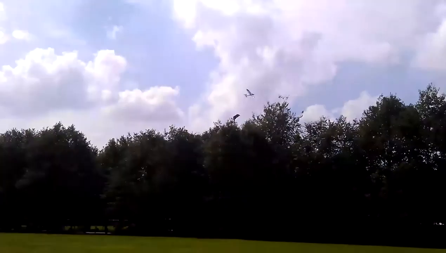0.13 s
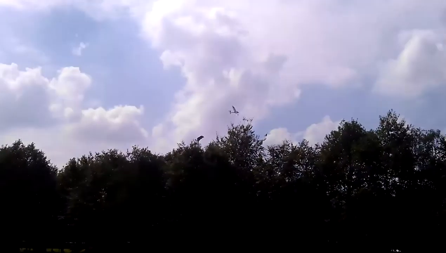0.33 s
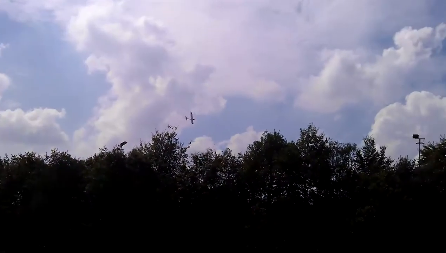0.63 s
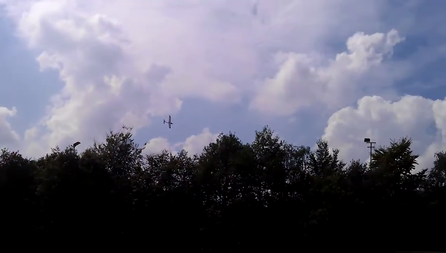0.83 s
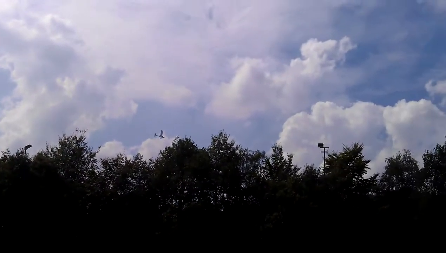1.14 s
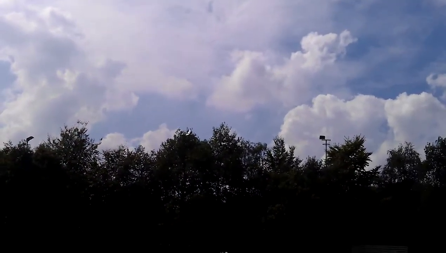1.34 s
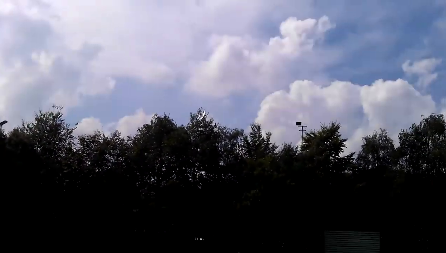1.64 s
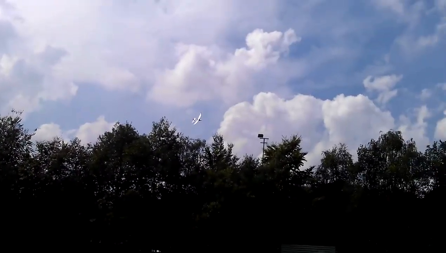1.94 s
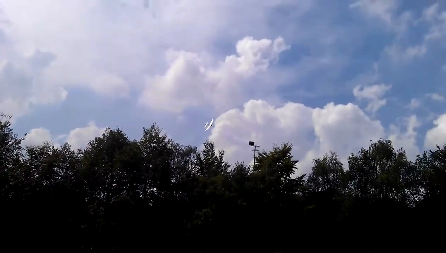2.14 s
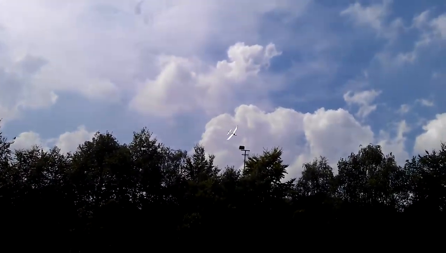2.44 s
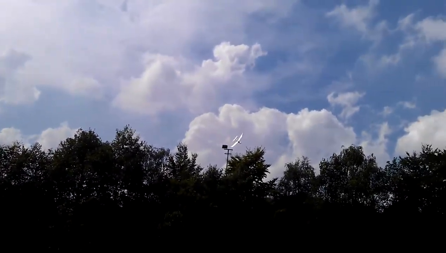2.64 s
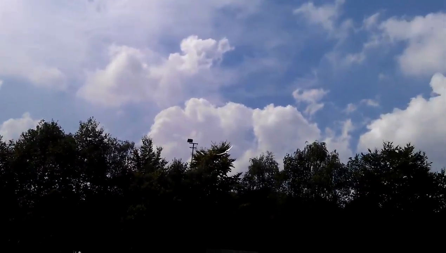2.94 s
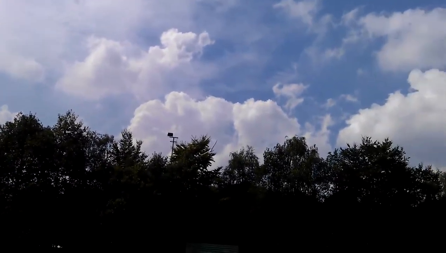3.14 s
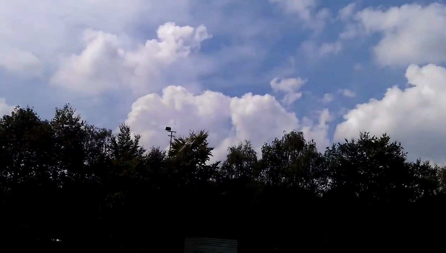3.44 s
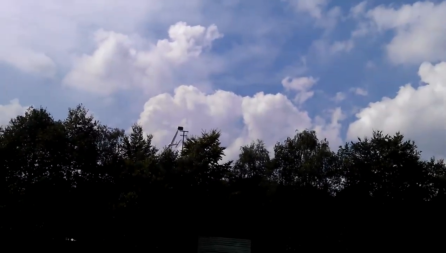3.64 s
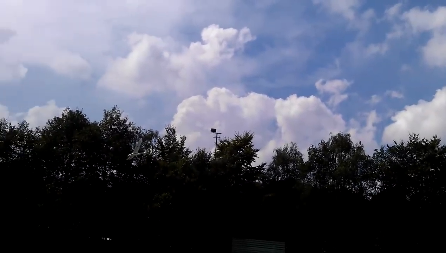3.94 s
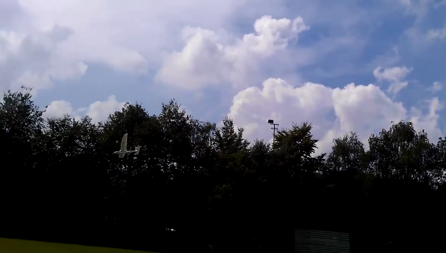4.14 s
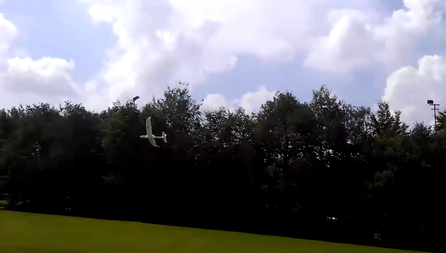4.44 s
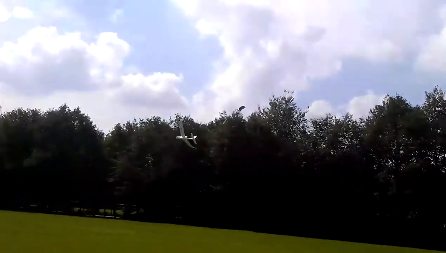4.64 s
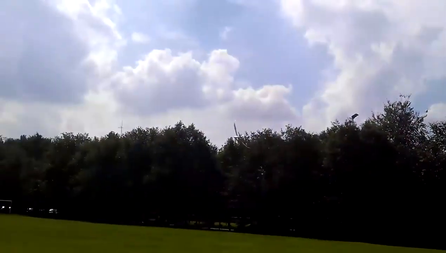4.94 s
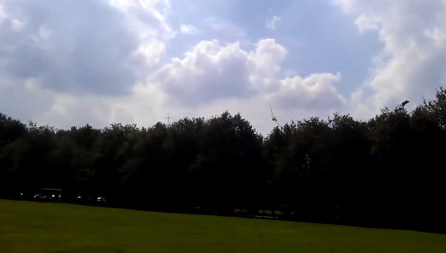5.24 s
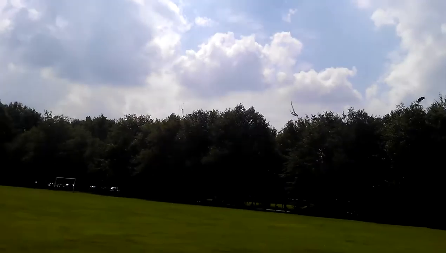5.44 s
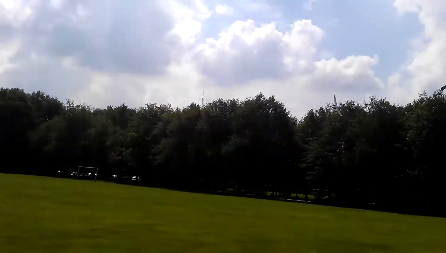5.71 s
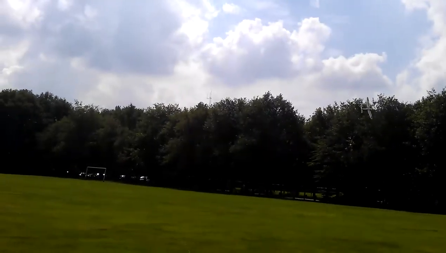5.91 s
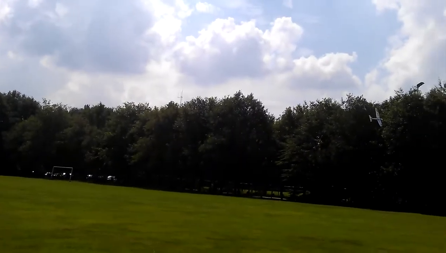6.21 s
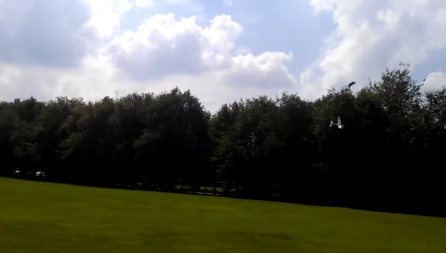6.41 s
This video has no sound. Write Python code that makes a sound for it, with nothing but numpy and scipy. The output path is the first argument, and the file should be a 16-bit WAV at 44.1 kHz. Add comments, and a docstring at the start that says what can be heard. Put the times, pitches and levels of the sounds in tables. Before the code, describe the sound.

After a brief silence, at about 0.7 seconds a small electric model plane is heard over an open field: a buzzing propeller, a high motor whine and a light rush of air. Faint distant traffic, leaves and a breeze lie underneath. From 1.5 seconds the buzz grows, swelling and dipping as the plane banks, its pitch rising only slightly. A soft bump on the hand-held camera comes at 2.6 seconds, followed by a faint far-off hoot. A sharp camera click sounds at 4 seconds. The plane is loudest between 4 and 4.6 seconds, dipping in pitch as it passes close. Then the throttle closes and the whine slides steeply down, fading out by about 6 seconds. A small click comes at 5.1 seconds, and a sleeve rustles faintly from 5.6 to 6.3 seconds over the quiet field.

```python
"""A small electric model plane circles over a field, passes close, then is throttled off and spins down.
Periodic blade loading gives the two-blade propeller its hum, and turbulence its rush. The motor whines
at multiples of the shaft rate; the speed controller sings at its Doppler-shifted switching rate.
Trees scatter a faint echo over distant traffic, leaves, a breeze and one far hoot.
The hand-held camera adds a bump, a few clicks and the rustle of a sleeve."""
import sys
import numpy as np
from scipy import signal
from scipy.fft import rfft, irfft
from scipy.io import wavfile
from scipy.ndimage import uniform_filter1d, map_coordinates

SR = 44100
rng = np.random.default_rng(int(sys.argv[2]) if len(sys.argv) > 2 else 0)


def log_audio(samples):
    """Write samples as a 16-bit WAV file to the path given in sys.argv[1]."""
    # one column per channel
    frames = np.atleast_2d(samples).T
    # limit to full scale, then quantise
    limited = np.clip(frames, -1, 1)
    pcm = np.round(limited * 32767).astype(np.int16)
    wavfile.write(sys.argv[1], SR, pcm)


N = 289869
T = np.arange(N) / SR

CUT_S, IDLE_S, DRIVE_STOP_S, STALL_S = 4.58, 4.9, 0.14, 6.0
AIRSPEED_M_S, SOUND_M_S, SWITCHING_HZ = 10.6, 343, 7750
TURN_S = (4.65, 4.87)  # start and end of the camera's turn away
POLE_ROUGHNESS = 0.18  # depth of fast random amplitude modulation

# Shaft rotation rate as heard: t/s, f/Hz
SHAFT_RATE = [(0.67, 223.3), (1.35, 223.3), (1.5, 227.3), (1.62, 228.2), (1.84, 232.0), (2.0, 233.1),
              (2.16, 231.7), (2.5, 233.1), (2.65, 236.0), (2.99, 238.3), (3.25, 237.2), (3.47, 241.1),
              (3.63, 239.7), (3.8, 239.7), (3.92, 240.7), (4.09, 239.5), (4.23, 237.0), (4.38, 231.9),
              (4.57, 228.1), (4.6, 223.5), (4.65, 212), (4.75, 199.5), (4.82, 182.0), (4.9, 147.7),
              (4.95, 129.5), (5.04, 107.6), (5.15, 87.8), (5.28, 68.9), (5.42, 54), (5.6, 40.5),
              (5.85, 23.9), (6.1, 8)]
# Velocity towards the listener: t/s, v/(m/s)
RADIAL_VELOCITY = [(0.67, -7.6), (1.32, -5.03), (1.92, 3.37), (2.82, 7.36), (3.2, 10.59), (3.78, 9.72),
                   (4.16, 4.89), (4.56, -7.79), (4.89, -13.57)]
# Loudness set by distance and throttle, relative to the close pass: t/s, level/dB
FLYBY_LEVEL = [(0.67, -14), (1.3, -15.5), (1.48, -9.5), (1.86, -6.5), (2.0, -13.5), (2.2, -13.5),
               (2.32, -6), (2.56, -9.5), (2.82, -7), (3.1, -11), (3.24, -10.5), (3.32, -6), (3.46, -6),
               (3.74, -8.5), (3.86, -2.5), (4.3, 0), (4.58, 0.5), (4.84, -9.5), (5.15, -21), (6.55, -31.5)]
# Shaft harmonics of the uneven blades: order, relative level/dB
RASP_ORDERS = [(1, -19), (3, -9.5), (5, -18.5), (6, -12.5), (7, -13), (8, -14), (9, -16.5), (11, -15.5),
               (12, -17.5), (13, -18), (14, -17.5), (15, -17.5), (16, -15.5), (17, -15.5), (19, -15),
               (20, -20), (34, -13)]
# Flares and dips of single harmonics in banking: t/s, half-width/s, order, gain/dB
BANKING_FLARES = [(1.47, .08, 10, 7), (1.48, .1, 12, 12), (1.53, .12, 8, 9.5), (1.55, .11, 14, 9),
                  (1.6, .08, 6, 10), (1.7, .06, 12, 6), (1.76, .06, 13, 10), (1.85, .07, 6, 9),
                  (2.35, .12, 7, 7), (2.35, .08, 17, 7), (2.6, .42, 1, 15), (2.55, .25, 3, 9),
                  (2.7, .2, 8, 9), (2.9, .1, 12, 6), (3.35, .1, 10, 8), (3.55, .16, 13, 9), (3.5, .2, 6, 5),
                  (3.55, .14, 11, 5), (3.83, .06, 16, 6), (3.92, .07, 9, 10.5), (3.93, .07, 11, 7),
                  (3.93, .09, 13, 5), (3.95, .07, 6, 4), (4.05, .11, 12, 6), (4.16, .06, 8, 8),
                  (4.2, .14, 6, -5), (4.26, .07, 3, 6), (4.27, .12, 5, 7), (4.3, .054, 7, 8),
                  (4.32, .055, 11, 11), (4.493, .09, 7, 5.5), (4.54, .08, 12, 6), (4.53, .04, 17, 6)]

# Envelopes of the plane's tones: t/s, relative level/dB
BLADE_LEVEL = [(0.67, -58), (1.16, -57.5), (1.63, -44.5), (2.09, -53), (2.33, -46.5), (3.29, -59),
               (3.67, -51.5), (4.13, -33.5), (4.34, -32.5), (4.58, -49), (4.66, -36), (4.93, -65)]
OCTAVE_LEVEL = [(.67, -56), (1.2, -60.5), (1.58, -47), (2.0, -66.5), (2.9, -65), (3.1, -56.5), (3.7, -51.5),
                (3.92, -41.5), (4.3, -33.5), (4.5, -47.5), (4.7, -48.5), (4.85, -72)]
AIRFRAME_LEVEL = [(0.67, -71.5), (1.4, -60), (1.6, -66), (2.05, -69.5), (2.3, -55), (2.6, -57), (2.9, -68),
                  (3.6, -65), (3.85, -59), (4.03, -48), (4.2, -46), (4.3, -48), (4.39, -59), (4.5, -44),
                  (4.6, -44.5), (4.68, -56), (4.8, -64)]
COMMUTATION_LEVEL = [(0.67, -44), (1.1, -44), (1.17, -56), (1.25, -43.5), (1.34, -46), (1.4, -34),
                     (1.46, -36), (1.54, -28), (1.6, -34), (1.64, -45), (1.7, -32), (1.8, -32.5),
                     (2.1, -47.5), (2.16, -50), (2.25, -34.5), (2.44, -31.5), (2.56, -40), (2.66, -30),
                     (2.84, -48.5), (2.89, -31.5), (2.96, -51), (3.03, -48.5), (3.25, -52), (3.36, -49.5),
                     (3.74, -51), (3.85, -31.5), (3.93, -34), (3.99, -44.5), (4.03, -34.5), (4.06, -43.5),
                     (4.1, -31), (4.15, -29), (4.2, -43), (4.28, -25), (4.35, -34), (4.44, -27),
                     (4.56, -33.5), (4.62, -26.5), (4.66, -47), (4.73, -43.5), (4.79, -61)]  # swells and fades as the plane banks
POLE_LEVEL = [(0.67, -58), (1.2, -62), (1.36, -52.5), (1.46, -54), (1.53, -44), (1.6, -45), (1.67, -49.5),
              (1.76, -45.5), (1.88, -49), (2.0, -52), (2.15, -55), (2.35, -50), (2.55, -56), (2.72, -49),
              (3.15, -57), (3.47, -48), (3.89, -50.5), (3.95, -60), (4.0, -44), (4.08, -42.5), (4.22, -51),
              (4.31, -38), (4.35, -45.5), (4.42, -42.5), (4.55, -49.5), (4.64, -49), (4.72, -48),
              (4.78, -58)]
SIDEBAND_LEVEL = [(0.67, -67), (3.7, -65), (4.2, -50), (4.3, -37), (4.34, -44.5), (4.42, -34), (4.6, -40.5),
                  (4.67, -64)]  # beamed to the rear
SWITCHING_LEVEL = [(0.67, -53), (0.78, -54), (0.92, -58), (1.34, -52.5), (1.44, -33), (1.51, -47),
                   (1.58, -35), (1.65, -44), (1.73, -38), (1.93, -50.5), (2.17, -50.5), (2.26, -43),
                   (2.47, -37.5), (2.6, -49), (2.68, -40), (2.74, -58), (2.8, -44), (2.88, -37),
                   (2.97, -53), (3.03, -44), (3.5, -44.5), (3.63, -55.5), (3.95, -44.5), (4.02, -34.5),
                   (4.13, -29), (4.21, -44.5), (4.27, -31.5), (4.33, -48.5), (4.41, -34.5), (4.5, -36.5),
                   (4.57, -45), (4.73, -47), (4.8, -63)]
LOWER_BEAT_LEVEL = [(0.67, -63.5), (1.3, -66.5), (1.47, -57), (2.05, -67.5), (2.75, -58.5), (3.18, -58),
                    (3.3, -46.5), (3.75, -47), (3.92, -44.5), (4.08, -58.5), (4.29, -43.5), (4.36, -62.5)]
# Envelope of the traffic rumble: t/s, level/dB
TRAFFIC_LEVEL = [(.65, -63), (2.7, -58), (3.3, -65.5), (4.6, -65), (5.4, -68), (6.5, -73.5)]

# Noise spectra, the propeller's three first: f/Hz, relative spectral level/dB
RUSH_SPECTRUM = [(40, -30.5), (90, -18), (125, -4.5), (220, 2.5), (350, -3), (600, 5), (1050, 4),
                 (1300, -2), (2400, -3.5), (3200, -12), (5000, -10.5), (9000, -49.5), (14000, -72.5)]
HISS_SPECTRUM = [(1200, -8.5), (2800, 0.5), (3700, 7.5), (4500, 5), (5500, 1.5), (6800, 1.5), (8400, 10),
                 (10000, -11), (11800, -24.5), (12600, -28.5), (14000, -57.5)]
SIZZLE_SPECTRUM = [(7000, -20.5), (9200, -1), (10700, 0.5), (11600, -3.5), (12400, -23), (13500, -59)]
FIELD_SPECTRUM = [(18, -78), (30, -49.5), (49, -15), (87, -24), (169, -2.5), (353, -4), (400, -9),
                  (443, -2), (1110, -1), (1390, -9), (1930, -10.5), (2370, -20.5), (6890, -32), (8440, -26),
                  (12000, -36), (13200, -70), (16000, -84.5)]
SLEEVE_SPECTRUM = [(1500, -18), (3800, -2), (5500, -7), (7000, -11), (8400, 4), (10500, -6), (12000, -22),
                   (15000, -45)]
TRAFFIC_SPECTRUM = [(70, -25.5), (125, -2.5), (220, 5.5), (320, -8), (600, -47.5)]
BREEZE_SPECTRUM = [(25, -25), (58, 7), (130, 0), (400, -37)]
HOOT_SPECTRUM = [(520, -30), (600, -3), (662, 3), (740, -3), (850, -40), (2000, -90)]
SWELL_SPECTRUM = [(60, -20), (170, 5), (1000, 6), (2500, -7), (6000, -35), (14000, -70)]

# Impacts on the camera: t/s, peak before panning/dB, left minus right/dB, cutoff f/Hz
CAMERA_CLICKS = [(3.9941, -8, 5, 14000), (4.0041, -22, 1, 10000), (5.0852, -31.5, 2, 6800)]
# Modes of the camera shell: f/Hz, T60/s, relative level/dB
SHELL_MODES = [(1730, 0.0049, -11.5), (2420, 0.0056, -10.5), (4200, 0.0049, -5), (4920, 0.0036, -5.5),
               (8720, 0.0025, 6), (10570, 0.0032, -2.5), (13560, 0.0011, -5)]
# Airframe resonances and notches: f/Hz, half-width/Hz, gain/dB
AIRFRAME_RESPONSE = [(6200, 900, 10), (5050, 250, 4), (4300, 210, 25), (3780, 170, 11), (3500, 90, 9),
                     (3350, 50, -9), (3170, 130, 9), (2880, 60, -7), (2630, 45, -9), (2500, 110, 6),
                     (2340, 35, -9), (2130, 60, 5), (1910, 130, 11), (1670, 50, -8), (1500, 90, 10),
                     (1330, 50, -10), (1170, 70, 4), (990, 130, 9)]
# Bands in which the airframe radiates the coasting overtones: harmonic, f/Hz, half-width/Hz, gain/dB
OVERTONE_BANDS = [(2, 6100, 400, -10), (2, 4500, 600, -9), (2, 3300, 450, -7.5), (3, 4300, 300, -1.5),
                  (3, 3750, 150, 1)]
# Sleeve strokes: t/s, half-width/s, level/dB
SLEEVE_STROKES = [(5.663, 0.05, -63), (5.746, .025, -63.5), (5.837, 0.04, -60), (6.193, 0.033, -66.5),
                  (6.303, 0.038, -64.5)]


def undb(db):
    """Amplitude ratio of a level in decibels."""
    return 10 ** (np.asarray(db) / 20)


def curve(table):
    """Linear interpolation of a table over time."""
    return np.interp(T, *np.transpose(table))


def ramp(start_s, end_s):
    """Linear rise from 0 to 1."""
    return np.clip((T - start_s) / (end_s - start_s), 0, 1)


def bell(x, centre, half_width):
    """Gaussian of height 1."""
    return np.exp(-((x - centre) / half_width) ** 2)


def pan(db):
    """Channel gains for a level difference, left minus right."""
    return undb(np.array([[db], [-db]]) / 2)


def walk(rate_hz):
    """Smooth random fluctuation of unit standard deviation."""
    hold = int(SR / rate_hz)
    steps = np.repeat(rng.standard_normal(N // hold + 1), hold)
    smooth = uniform_filter1d(uniform_filter1d(steps, hold), hold)[:N]
    return smooth / smooth.std()


def noise(spectrum, wide_hz, width):
    """Coloured stereo noise of rms 1, whose coherence between channels falls around wide_hz."""
    f = np.arange(N // 2 + 1) * SR / N + 1
    hz, db = np.transpose(spectrum)
    mid, side = rfft(rng.standard_normal((2, N))) * undb(np.interp(np.log(f), np.log(hz), db))
    side = side * width * (f + wide_hz / 8) / (f + wide_hz)
    stereo = irfft(np.array([mid + side, mid - side]), N)
    return stereo / stereo.std()


def tone(phase, flutter_db, jitter_rad):
    """Scintillation: turbulent air modulates a sinusoid in level and phase."""
    return np.sqrt(2) * np.sin(phase + jitter_rad * walk(60)) * undb(flutter_db * walk(30))


def shadowed_tone(phase, pan_db, flutter_db, jitter_rad):
    """Acoustic shadow: at the left microphone port, reflections make a high tone waver."""
    phase = phase + jitter_rad * walk(60)
    left = np.sin(phase + 0.75 * walk(8)) * undb(1.5 * walk(9.4))
    return np.sqrt(2) * np.array([left, np.sin(phase)]) * undb(flutter_db * walk(30)) * pan(pan_db)


def head_on():
    """Forward directivity: squared cosine of the approach angle, 0 when receding."""
    return np.clip(curve(RADIAL_VELOCITY) / AIRSPEED_M_S, 0, 1) ** 2


def flyby_gain(db, growth, head_on_db):
    """Spreading and directivity: a layer gains as the plane nears and faces the listener."""
    return undb(db + growth * curve(FLYBY_LEVEL) + head_on_db * head_on())


def banking_db(order):
    """Uneven inflow in banking raises or lowers one shaft harmonic."""
    return sum(db * bell(T, s, half) for s, half, k, db in BANKING_FLARES if k == order)


def throttle():
    """Throttle opening: 1 under power, 0 at idle."""
    return 1 - ramp(CUT_S, IDLE_S)


def drive():
    """Motor current: 1 until the last part of the throttle's closing, then falling to 0."""
    return 1 - ramp(IDLE_S - DRIVE_STOP_S, IDLE_S)


def blade_hum(shaft_angle):
    """Periodic loading: two blades radiate at twice the shaft rate and its octave until they slow."""
    loading = 1 - ramp(IDLE_S, IDLE_S + DRIVE_STOP_S)
    hum = undb(curve(BLADE_LEVEL)) * tone(2 * shaft_angle, flutter_db=1.13, jitter_rad=0.061)
    octave = undb(curve(OCTAVE_LEVEL)) * tone(4 * shaft_angle, flutter_db=1.0, jitter_rad=0.064)
    return loading * (hum + octave)


def blade_rasp(shaft_angle):
    """Asymmetry: uneven blades radiate odd and even shaft harmonics, the high ones beamed forward."""
    tilt_db_per_octave = 3.5 * head_on()
    rasp = 0
    for order, db in RASP_ORDERS:
        partial = tone(order * shaft_angle + rng.uniform(0, 2 * np.pi), flutter_db=1.3, jitter_rad=0.15)
        ground_db = 1.4 * walk(6)  # the ground reflection adds or cancels
        beam_db = tilt_db_per_octave * min(np.log2(order / 5.4), 1)
        rasp = rasp + partial * undb(db + banking_db(order) + ground_db + beam_db)
    return drive() * flyby_gain(-40.5, growth=1.29, head_on_db=0.47) * rasp


def airframe_ring(shaft_angle):
    """Forced vibration: the fifth blade harmonic rings the airframe."""
    gain = drive() * undb(curve(AIRFRAME_LEVEL) + banking_db(order=10))
    return gain * tone(10 * shaft_angle, flutter_db=2.5, jitter_rad=0.15)


def propeller_rush(shaft_angle):
    """Turbulence radiates broadband noise; its treble pulses with each blade and carries least far."""
    body = noise(RUSH_SPECTRUM, wide_hz=1816, width=0.8) * pan(0.6)
    body *= flyby_gain(-40.5, growth=0.9, head_on_db=0.1)
    hiss = noise(HISS_SPECTRUM, wide_hz=5030, width=0.47) * pan(-3)
    hiss *= flyby_gain(-38, growth=1.31, head_on_db=3.9)
    sizzle = noise(SIZZLE_SPECTRUM, wide_hz=3000, width=1.0) * pan(6.6)
    sizzle *= flyby_gain(-47.5, growth=1.9, head_on_db=5.1)
    chop = 1 + 0.24 * np.cos(2 * shaft_angle)
    return body + chop * (hiss + sizzle)


def motor_whine(shaft_angle):
    """Magnetic forcing: poles sound at 18 times the shaft rate, commutation at 36, a sideband at 38."""
    whine = shadowed_tone(36 * shaft_angle, pan_db=-8, flutter_db=1.5, jitter_rad=0.086)
    whine *= undb(curve(COMMUTATION_LEVEL) - 2)
    pole_gain = undb(curve(POLE_LEVEL)) * (1 + POLE_ROUGHNESS * walk(350))
    poles = pole_gain * tone(18 * shaft_angle, flutter_db=1.5, jitter_rad=0.21) * pan(-1)
    sideband = shadowed_tone(38 * shaft_angle, pan_db=-10.5, flutter_db=2.5, jitter_rad=0.15)
    sideband *= throttle() * undb(curve(SIDEBAND_LEVEL))
    return drive() * (whine + poles + sideband)


def speed_controller(shaft_angle):
    """Intermodulation: the switching tone beats with the pole tone and its third harmonic."""
    doppler_hz = SWITCHING_HZ / (1 - curve(RADIAL_VELOCITY) / SOUND_M_S)
    phase = 2 * np.pi * np.cumsum(doppler_hz) / SR
    carrier = shadowed_tone(phase, pan_db=-14.5, flutter_db=1.4, jitter_rad=0.097)
    carrier *= undb(curve(SWITCHING_LEVEL) - 3)
    lower_gain = undb(curve(LOWER_BEAT_LEVEL)) * (1 + POLE_ROUGHNESS * walk(350))
    lower_beat = lower_gain * tone(phase - 18 * shaft_angle, flutter_db=2.0, jitter_rad=0.25)
    flare = undb(11.3 * bell(T, 1.86, 0.085))
    upper_gain = flare * flyby_gain(-57.5, growth=0.95, head_on_db=0.86)
    upper_beat = upper_gain * tone(54 * shaft_angle - phase, flutter_db=3, jitter_rad=0.4)
    return drive() * carrier + throttle() * (lower_beat + upper_beat)


def port_delay(stereo):
    """Path difference: sound reaches the far port later; the plane changes sides as it leaves."""
    left_lead_ms = np.interp(T, TURN_S, (0.018, -0.038))
    right_index = (T - left_lead_ms / 1000) * SR
    return np.array([stereo[0], map_coordinates(stereo[1], [right_index], order=3)])


def tree_echo(stereo, t60_s, db):
    """Diffuse scattering: the tree line returns a dull, exponentially decaying tail."""
    t = T[:SR]
    mid, side = rng.standard_normal((2, SR)) * undb(-60 * t / t60_s) * (1 - np.exp(-t / 0.082))
    lowpass = signal.butter(1, 3500, fs=SR, output="sos")
    tail = signal.sosfilt(lowpass, [mid + 0.15 * side, mid - 0.15 * side])
    tail /= np.sqrt(np.sum(tail[0] ** 2))
    return undb(db) * signal.fftconvolve(stereo, tail, axes=1)[:, :N]


def field_ambience():
    """Incoherent sources sum to noise: distant traffic and leaves, and a breeze on the ports."""
    fade_db = -4 * ramp(*TURN_S) - 0.72 * T
    distant = noise(FIELD_SPECTRUM, wide_hz=600, width=0.81) * undb(-50.5 + fade_db + 0.55 * walk(6.5))
    rumble = noise(TRAFFIC_SPECTRUM, wide_hz=900, width=0.48) * undb(curve(TRAFFIC_LEVEL) + walk(5.4))
    gust_db = 8 * bell(T, 1.65, 0.25)
    breeze_gain = undb(-77 + fade_db + gust_db + 2.5 * walk(6.1))
    breeze = breeze_gain * noise(BREEZE_SPECTRUM, wide_hz=11.15, width=0.36) * pan(3.5)
    return distant + rumble + breeze


def finger_bump():
    """A soft push and release on the camera makes one bipolar pressure pulse."""
    scaled_time = (T - 2.6165) / 0.0009
    return undb(-24.5) * -scaled_time * np.exp(-scaled_time ** 2)


def far_hoot():
    """Narrow-band noise has a blurred pitch, heard as one far-off hoot."""
    return undb(-46.5) * bell(T, 2.768, 0.12) * noise(HOOT_SPECTRUM, wide_hz=900, width=0.23)


def camera_clicks():
    """Impulse response: each click is a brief crack and the damped modes of the camera shell."""
    clicks, contact_s = 0, 0.0009
    for s, db, pan_db, cutoff_hz in CAMERA_CLICKS:
        t = np.maximum(T - s, 0)
        ring = sum(undb(mode_db - 60 * t / t60) * np.sin(2 * np.pi * hz * t)
                   for hz, t60, mode_db in SHELL_MODES)
        decay = np.exp(-t / contact_s)
        crack = 0.3 * rng.standard_normal((2, N)) * decay
        lowpass = signal.butter(4, cutoff_hz, fs=SR, output="sos")
        click = signal.sosfilt(lowpass, (ring + crack) * (1 - decay))
        clicks = clicks + undb(db) * pan(pan_db) * click / np.abs(click).max()
    return clicks


def coasting_rotor(shaft_angle, shaft_hz):
    """Swept resonance: the cogging rotor's falling whine flares in each airframe mode it crosses."""
    phase, hz = 36 * shaft_angle, 36 * shaft_hz
    response_db = sum(db * bell(hz, centre, half) for centre, half, db in AIRFRAME_RESPONSE)
    whine = undb(response_db) * tone(phase, flutter_db=2.0, jitter_rad=0.25) * pan(-1.1)
    overtones = sum(undb(db) * bell(k * hz, centre, half) * tone(k * phase, flutter_db=2.5, jitter_rad=0.5)
                    for k, centre, half, db in OVERTONE_BANDS)
    fade = undb(-61 - 9 * np.maximum(T - IDLE_S, 0))
    freewheeling = (1 - drive()) * (1 - ramp(STALL_S - 0.17, STALL_S))
    return fade * freewheeling * (whine + overtones)


def low_swell():
    """Low noise under a Gaussian envelope swells and fades briefly."""
    return undb(-50.5) * bell(T, 5.01, 0.06) * noise(SWELL_SPECTRUM, wide_hz=1800, width=1.0)


def sleeve_rustle():
    """Sliding friction: cloth brushing the camera gives uneven bursts of bright noise."""
    strokes = sum(undb(db) * bell(T, s, half) for s, half, db in SLEEVE_STROKES)
    return strokes * undb(2 * walk(120)) * noise(SLEEVE_SPECTRUM, wide_hz=5000, width=0.68) * pan(-7)


def scene():
    """Superposition: one shaft drives propeller and motor, heard with the field and camera noises."""
    shaft_hz = curve(SHAFT_RATE) * (1 + 0.0005 * walk(18))  # the speed hunts slightly
    angle = 2 * np.pi * np.cumsum(shaft_hz) / SR
    propeller = blade_hum(angle) + blade_rasp(angle) + airframe_ring(angle) + propeller_rush(angle)
    motor = motor_whine(angle) + coasting_rotor(angle, shaft_hz) + speed_controller(angle)
    plane = port_delay(propeller + motor)
    echo = tree_echo(plane, t60_s=0.29, db=-23)
    handling = finger_bump() + camera_clicks() + sleeve_rustle()
    return plane + echo + handling + field_ambience() + far_hoot() + low_swell()


def record(dry):
    """Band limiting: the camera, silent until it starts, cuts the deep bass and the top treble."""
    start_s = 0.652
    highpass = signal.butter(6, 56, "high", fs=SR, output="sos")
    lowpass = signal.ellip(8, 0.2, 70, 16000, fs=SR, output="sos")
    return signal.sosfilt(lowpass, signal.sosfilt(highpass, dry * (T >= start_s)))


dry = scene()
out = record(dry)
log_audio(out)
```